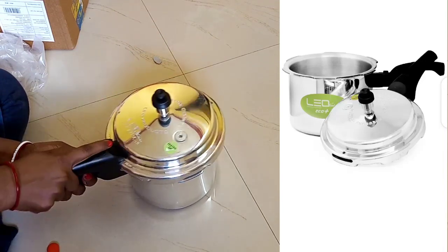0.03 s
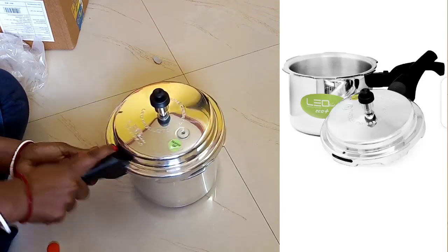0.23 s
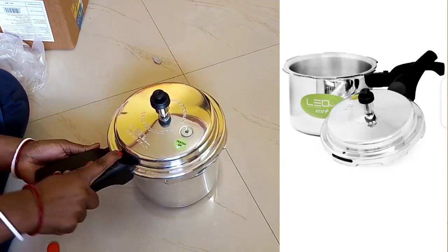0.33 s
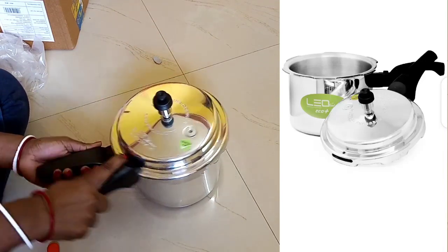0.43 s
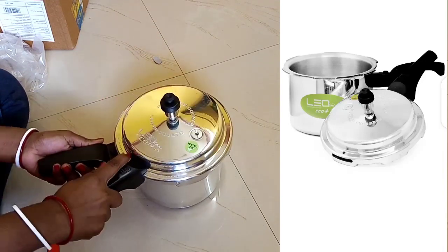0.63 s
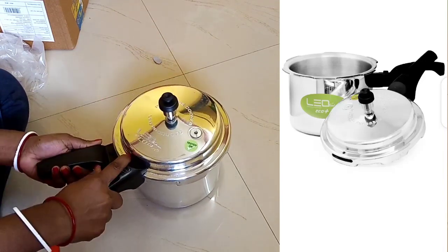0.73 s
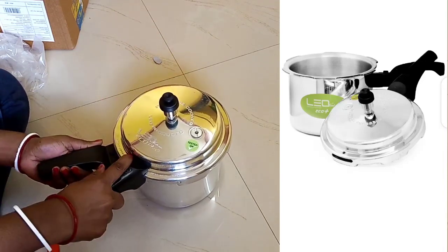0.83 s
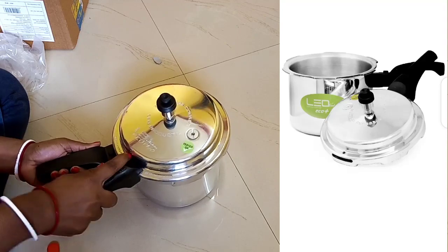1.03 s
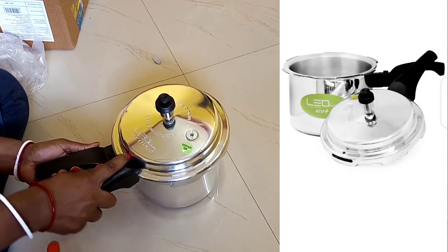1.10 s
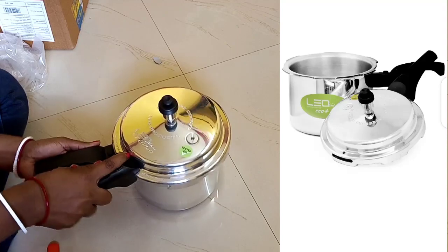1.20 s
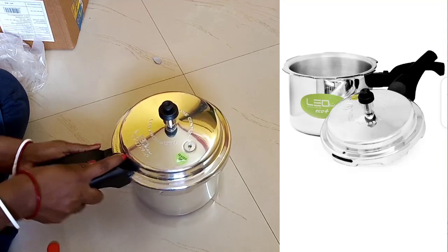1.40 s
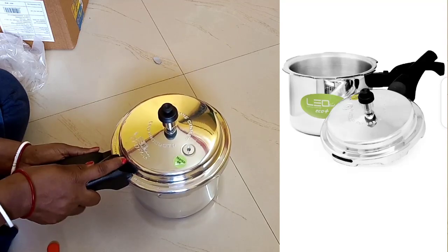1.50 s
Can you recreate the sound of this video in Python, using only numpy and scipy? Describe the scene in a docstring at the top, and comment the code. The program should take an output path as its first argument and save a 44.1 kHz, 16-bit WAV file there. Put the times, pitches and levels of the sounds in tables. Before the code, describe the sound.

A steel pressure cooker lid slides round the rim from the start, scraping with small knocks and a low, unsteady groan. At about 0.6 seconds it seats with a loud double clack. A softer clack comes near 1.1 seconds as the handles close, then a faint tick around 1.5 seconds. Hands bump and rub softly. The sound is close, and the quiet tiled room rings briefly after each knock.

```python
"""A quiet room with a tiled floor and bare walls, one microphone near a steel pressure cooker.
The lid is slid round the rim, scraping and groaning as it sticks and slips, seats with a loud
double clack, then clacks again as the handles are closed; a last tick follows. The hands shift
with soft low bumps, and the hard room rings after every blow."""
import sys
import numpy as np
from scipy import signal
from scipy.fft import rfft, irfft
from scipy.io import wavfile

SR = 44100
rng = np.random.default_rng(int(sys.argv[2]) if len(sys.argv) > 2 else 0)


def wav_out(sig):
    """Save sig, one row per channel (or a flat mono array), as 16-bit PCM at SR to the path in sys.argv[1]."""
    wavfile.write(sys.argv[1], SR, np.round(np.clip(np.atleast_2d(sig).T, -1, 1) * 32767).astype(np.int16))


N = 68355
T = np.arange(N) / SR
HZ = np.maximum(np.arange(N // 2 + 1) * SR / N, 1)


def clacks():
    """The lid knocks against the rim of the pot; two rows, crack and ring."""
    # knocks: t/s, level/dB, then bass/dB, hollow middle/dB, treble/dB, rim/dB, clang/dB, lid ring/dB
    knocks = [(.078, -52.5, -10, 4, 2, 0, 5.5, -8), (0.1205, -33, -14, 0.5, 1.5, -3.5, 1.5, 3.5),
              (.140, -39.5, 4, -3, 1, -1, -4, 2), (0.184, -43, -12, -19, -8.5, 14.5, -4.5, -3),
              (.207, -39.5, 13.5, -4.5, -7.5, -11, 1.5, -17), (0.216, -37.5, 9.5, -5.5, -9, 2, -2, 8),
              (.374, -39.5, 18.5, -3.5, -19.5, 2, -2.5, 0.5), (.397, -41, 11, -1, 4, -2, -3, 0),
              (0.551, -53, 3, -6, -0.5, -4, 2.5, -2), (0.5882, -21, -1, 5.5, -1.5, 5.5, 2.5, 0),
              (0.5938, -21.5, 0, 3.5, -5.5, -2, -1, -5.5), (0.6022, -27, 1, 6, -4, 0.5, -5, -4.5),
              (.6144, -20, -5.5, -7.5, 11, 2.5, -0.5, 0), (.6210, -22, 0, 0.5, 9.5, 7.5, -1.5, -3.5),
              (1.113, -38, 5, 10.5, 14, 6, 3.5, -5.5), (1.119, -33.5, 0.5, 1.5, 5, 5.5, 2, 1.5),
              (1.127, -32.5, 1, -1, -6, 5, 0, -16), (1.143, -50.5, 3.5, 21, -13.5, 0, 7, 3.5),
              (1.161, -36, -3, -13.5, 2, -10, 0.5, 1.5), (1.4615, -42, -12, -8.5, -16, 4.5, 1, -7)]
    out = np.zeros((2, N))
    for at, db, *tone_db, lid_db in knocks:
        start = int(at * SR)
        out[:, start:] += undb(db) * steel(*tone_db, lid_db=lid_db - 18, pot_db=-17.5)[:, :N - start]
    return out


def steel(bass_db, hollow_db, treble_db, rim_db, clang_db, lid_db, pot_db):
    """One contact of steel on steel as two rows: a crack of crowded modes and a ring of clear ones."""
    # crowd of short-lived modes in the sheet steel: f/Hz, relative level/dB
    crowded_modes = [(40, -32.5), (95, -20.5), (160, -7), (300, 2), (400, 0.5), (510, -2), (620, -2.5),
                     (1100, -0.5), (1550, -3.5), (1950, -8.5), (2550, -3.5), (3350, -5), (3900, -7),
                     (4450, -4.5), (5400, -9.5), (5900, 0), (6250, -3.5), (6900, -4), (8300, -14.5),
                     (9300, -14.5), (10400, -26), (12300, -32.5), (13800, -34), (15100, -28),
                     (16000, -41.5)]
    # clear modes of the lid: f/Hz, level/dB, t60 before the grip/s
    lid_modes = [(519, 0, .2), (807, -6, .3), (1112, -4, .25), (1351, -5, .3), (1735, -3.5, .3),
                 (2159, -7, .2), (2282, -9, .27), (2625, -8, .35), (3270, 0, .33), (3505, -4, .25),
                 (4393, -5, .3), (4910, -6, .28), (5764, -5, .27), (5835, -5, .25), (5895, -3, .3),
                 (6660, -1, .33)]
    # clear modes of the pot: f/Hz, level/dB, t60 before the grip/s
    pot_modes = [(158, -15, .45), (226, -5, .38), (270, 3, .18), (322, 1, .15), (374, 2, .24),
                 (514, 6, .22), (576, -6, .35), (674, -7, .3), (981, -10, .28), (1055, -8, .28),
                 (1594, -5, .25), (2236, -7, .3), (2987, -6, .28), (3318, -1, .28), (3598, -3, .22),
                 (5104, -8, .28), (6015, -5, .28), (6620, -2, .26), (6840, 1, .18), (6884, -1, .17),
                 (7014, -1, .2), (7544, -9, .24), (9326, -14, .22), (12183, -16, .17), (12684, -23, .17),
                 (15037, -18, .15)]
    grip_detune, grip_damping = .0015, 1.15  # the grip shifts and shortens the modes a little

    def contact(hz):
        """Where and how hard the contact lands weights five bands."""
        bass = 1 / (1 + (hz / 580) ** 2)
        hollow = bell(np.log2(hz / 830), width=.65)
        treble = 1 / (1 + (7900 / hz) ** 6)
        rim = bell(hz - 6920, width=270)
        clang = bell(np.log2(hz / 2950), width=.7)
        return undb(bass_db * bass + hollow_db * hollow + treble_db * treble
                    + rim_db * rim + clang_db * clang)

    def ring(modes):
        """Each mode starts with a random sign and dies away."""
        out = np.zeros(N)
        for hz, db, t60 in modes:
            side, shift = rng.standard_normal(2)
            swing = np.sign(side) * np.sin(2 * np.pi * hz * (1 + grip_detune * shift) * T)
            out += undb(db) * contact(hz) * fade(t60 / grip_damping) * swing
        return out

    burst = rng.standard_normal(N) * fade(t60=.056)
    crack = undb(.37) * shape(burst, colour(crowded_modes) * contact(HZ))
    return np.array([crack, undb(lid_db) * ring(lid_modes) + undb(pot_db) * ring(pot_modes)])


def thumps():
    """A heavy push flexes the whole lid: its lowest modes start together and the hand soon stops them."""
    # pushes on the lid: t/s, level/dB
    pushes = [(0.13, -31), (0.207, -32), (.381, -33), (0.5892, -16), (1.113, -31)]
    # lowest modes of the lid, damped by the hand: f/Hz, level/dB, t60/s
    low_modes = [(205, -12.5, 0.14), (302.8, -3.5, 0.077), (380.4, -13, 0.039), (507.5, -11.5, .16)]
    flex = sum(undb(db) * fade(t60) * np.sin(2 * np.pi * hz * T) for hz, db, t60 in low_modes)
    out = np.zeros(N)
    for at, db in pushes:
        start = int(at * SR)
        out[start:] += undb(db) * flex[:N - start]
    return out


def scrape(places=4, catches_per_s=1500):
    """Tiny catches at several places round the rim shake mostly the lid; two rows, crack and ring."""
    # the lid sliding on the rim: t/s, level/dB
    slide = [(0, -31.5), (.025, -52), (.06, -59.5), (.11, -60), (.15, -47.5), (.225, -45), (.28, -61.5),
             (.35, -47.5), (.405, -43), (.46, -63), (.50, -53.5), (.565, -49), (.588, -37.5), (.62, -98.5),
             (1.07, -73), (1.105, -45.5), (1.14, -65.5), (1.55, -77.5)]
    out = np.zeros((2, N))
    for _ in range(places):
        catches = (rng.random(N) < catches_per_s / places / SR) * rng.choice([-1, 1], N)
        catches = catches * undb(2 * np.minimum(rng.exponential(size=N), 4))  # uneven in strength
        force = catches / catches.std() * undb(curve(slide))
        body = steel(bass_db=10.5, hollow_db=0, treble_db=2, rim_db=-8.5, clang_db=-1.5,
                     lid_db=-13, pot_db=-21)
        out += np.array([through(force, part / np.linalg.norm(body)) for part in body])
    return out / np.sqrt(places)


def groan(jitter=.036, flutter_db=2, overtone_db=-20, release_s=.022):
    """Stick and slip of the lid on the rim keep the pot swinging at one low, unsteady pitch until the lid
    seats."""
    # swing of the pot under the sticking lid: t/s, f/Hz, level/dB
    swing = [(0, 294, -46.5), (.015, 289, -37), (.042, 291.4, -39.5), (.072, 292.5, -52.5),
             (.112, 311.7, -61.5), (.138, 287, -37), (.17, 292.3, -46.5), (.198, 298, -38.5),
             (.212, 310.8, -30), (.245, 291.2, -40), (.282, 291.8, -49), (.32, 288, -39.5),
             (.356, 287, -35), (.392, 301.5, -37.5), (.425, 267.3, -42), (.46, 255.6, -42.5),
             (.515, 272.2, -47.5), (.585, 260.5, -46.5)]
    pitch_hz = curve(swing) * (1 + jitter * wander(hz=68))
    phase = 2 * np.pi * np.cumsum(pitch_hz) / SR
    level = undb(curve(swing, column=2) + flutter_db * wander(hz=57))
    release = np.exp(-np.maximum(T - swing[-1][0], 0) / release_s)
    return level * release * np.sqrt(2) * (np.sin(phase) + undb(overtone_db) * np.sin(2 * phase))


def hands(bump_flutter_db=2.5, rub_flutter_db=2.9):
    """The hands bump softly and rub unevenly on the handles."""
    # low bumps of the hands: t/s, level/dB
    bump_levels = [(0, -94), (.6, -67), (.68, -63), (.85, -63.5), (.93, -79), (1.3, -66), (1.322, -57.5),
                   (1.338, -52), (1.385, -58.5), (1.40, -65), (1.42, -55.5), (1.47, -57), (1.51, -85),
                   (1.545, -55.5)]
    # spectrum of the bumps: f/Hz, relative level/dB
    bump_spectrum = [(20, -4), (40, -11.5), (58, 4.5), (90, 1), (130, 1), (200, -15.5), (400, -29.5),
                     (1000, -66)]
    # rubbing of the fingers: t/s, level/dB
    rub_levels = [(0, -94.5), (1.15, -97.5), (1.26, -57), (1.33, -65.5), (1.40, -78), (1.465, -57.5),
                  (1.52, -68), (1.545, -58)]
    # spectrum of the rubbing: f/Hz, relative level/dB
    rub_spectrum = [(80, -26.5), (250, -4), (520, 1.5), (800, -6.5), (1100, -6), (1500, -30.5),
                    (4000, -17.5), (7000, -18.5), (12000, -35)]
    bumps = noise(colour(bump_spectrum)) * undb(curve(bump_levels) + bump_flutter_db * wander(hz=25))
    rub = noise(colour(rub_spectrum)) * undb(curve(rub_levels) + rub_flutter_db * wander(hz=76))
    return bumps + rub


def room(x, level_db=-3, delay_s=.0036, build_s=.0072):
    """Tiles and bare walls send a dense tail back to the microphone; its treble dies first."""
    # reverberation by band: f/Hz, t60/s, relative level/dB
    bands = [(103, 0.64, 9.5), (292, 0.51, -3), (700, 0.42, -1), (2020, 0.42, 1), (4240, 0.45, -0.5),
             (7500, 0.43, -1.7), (11700, 0.26, 2)]
    centres = np.log([row[0] for row in bands])
    white = rfft(rng.standard_normal(N))
    tail = np.zeros(N)
    for share, (_, t60, db) in zip(np.eye(len(bands)), bands):
        band = irfft(white * np.interp(np.log(HZ), centres, share), N)
        tail += band * fade(t60) * undb(db)
    tail *= 1 - np.exp(-np.maximum(T - delay_s, 0) / build_s)
    return undb(level_db) * through(x, tail / np.linalg.norm(tail))


def room_tone(level_db=-69.5):
    """The still air of the room: a faint rumble and a fainter hiss."""
    # spectrum of the air: f/Hz, relative level/dB
    air = [(20, 32), (70, 9), (160, 8), (400, -12.5), (1500, -37), (6000, -8.5), (11000, -6.5),
           (16000, -20)]
    return noise(colour(air)) * undb(level_db)


def undb(db):
    """Decibels to gain."""
    return 10 ** (np.asarray(db) / 20)


def bell(offset, width):
    """Bell curve, 1 at its centre."""
    return np.exp(-.5 * (offset / width) ** 2)


def curve(table, column=1):
    """One column of a table, joined by straight lines in time."""
    rows = np.array(table)
    return np.interp(T, rows[:, 0], rows[:, column])


def colour(points):
    """Gain at each frequency from points (f/Hz, level/dB), with unit power."""
    hz, db = np.array(points).T
    gain = undb(np.interp(np.log(HZ), np.log(hz), db))
    return gain / np.sqrt(np.mean(gain ** 2))


def noise(gain):
    """Noise with the given gain at each frequency."""
    return irfft(rfft(rng.standard_normal(N)) * gain, N)


def fade(t60):
    """Free decay by 60 dB in t60 seconds."""
    return np.exp(-np.log(1000) * T / t60)


def wander(hz):
    """Random drift, mostly slower than hz, with spread 1."""
    drift = noise(1 / (1 + (HZ / hz) ** 4))
    return drift / drift.std()


def through(x, response):
    """Play a sound through an impulse response."""
    return signal.fftconvolve(x, response)[:N]


def shape(x, gain):
    """Causal (minimum-phase) filter with the given gain at each frequency."""
    cepstrum = irfft(np.log(gain), N)
    cepstrum[1:N // 2] *= 2
    cepstrum[N // 2:] = 0
    response = irfft(np.exp(rfft(cepstrum)), N)
    return through(x, response[:N // 8])


def scene():
    """The cooker and the hands up close, the hard room behind them, in mono."""
    radiate_hz = 146  # below this the small pot moves hardly any air
    radiation = signal.butter(3, radiate_hz, "high", fs=SR, output="sos")
    crack, ring = signal.sosfilt(radiation, scrape() + clacks())
    low = groan() + signal.sosfilt(radiation, thumps())
    echo = room(crack + .19 * ring + .3 * low)
    return (crack + ring + low + echo + hands() + room_tone())[None]


def record(dry):
    """The recorder cuts the lowest bass and the top of the microphone's signal."""
    low_cut_hz, top_hz = 41, 15600
    low_cut = signal.butter(2, low_cut_hz, "high", fs=SR, output="sos")
    top_cut = signal.ellip(8, .2, 80, top_hz, fs=SR, output="sos")
    return signal.sosfilt(top_cut, signal.sosfilt(low_cut, dry))


dry = scene()
out = record(dry)
wav_out(out)
```